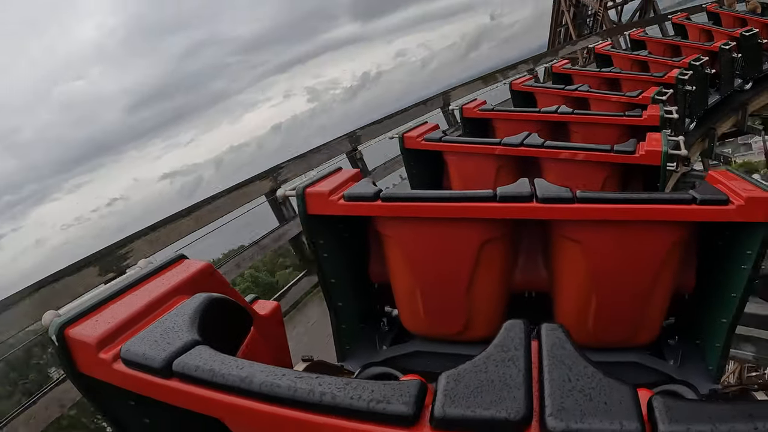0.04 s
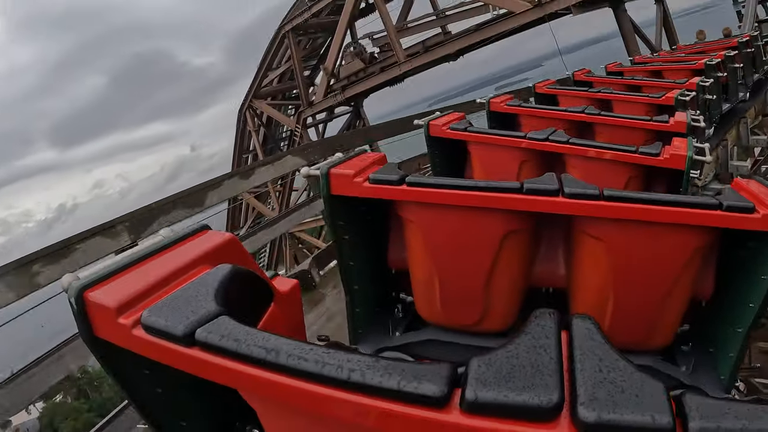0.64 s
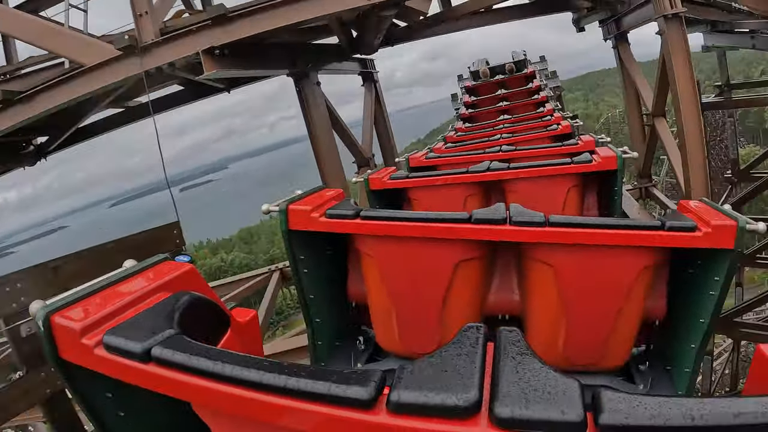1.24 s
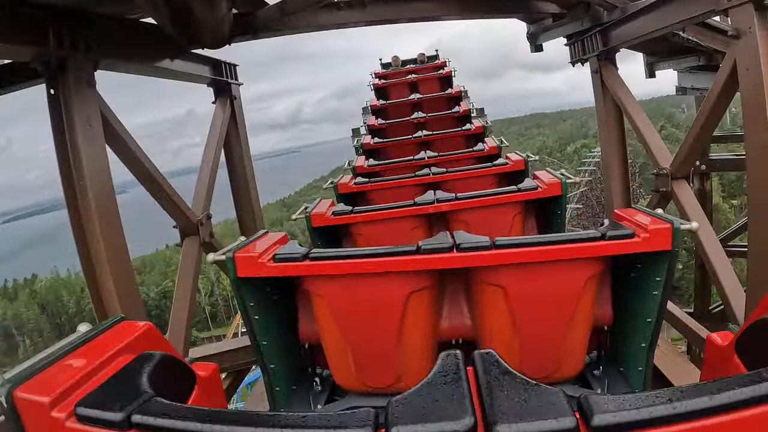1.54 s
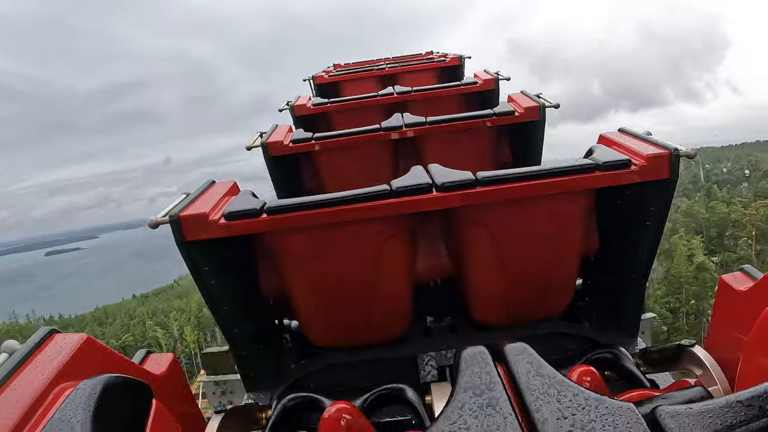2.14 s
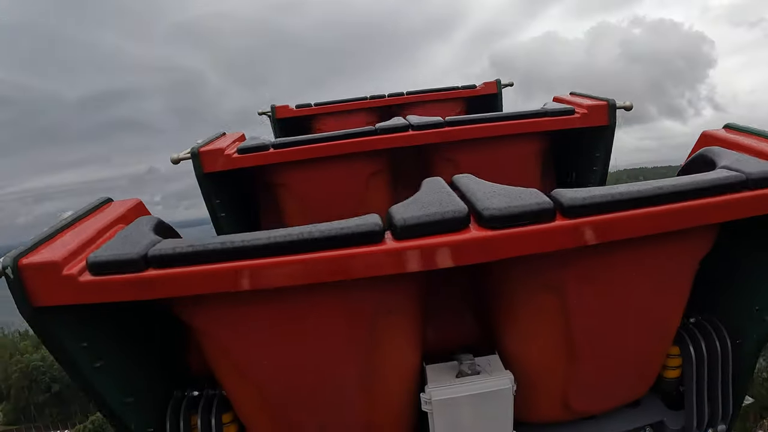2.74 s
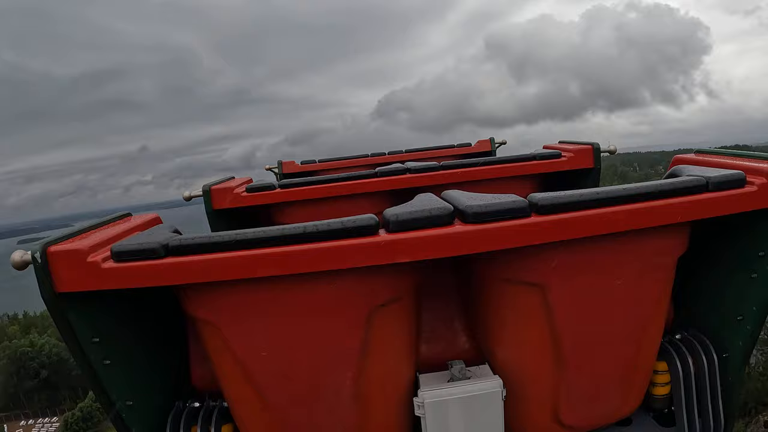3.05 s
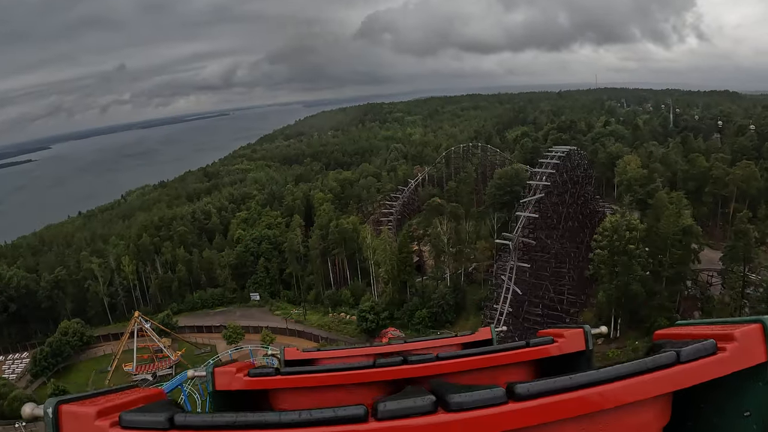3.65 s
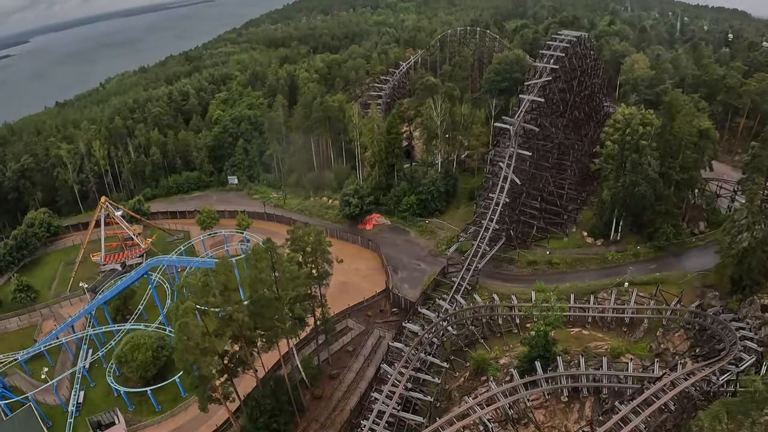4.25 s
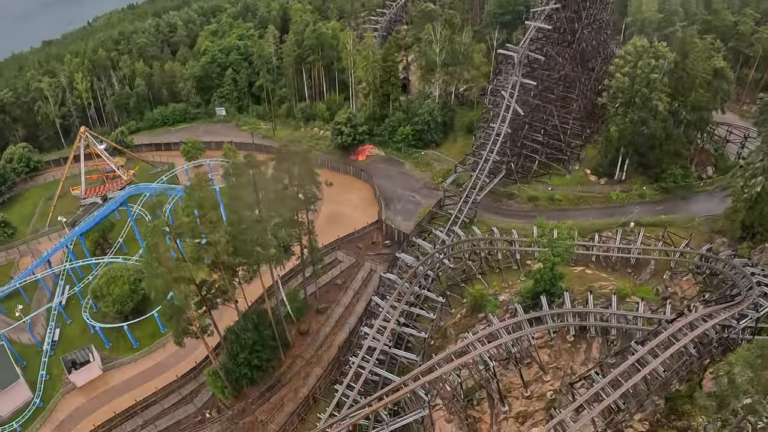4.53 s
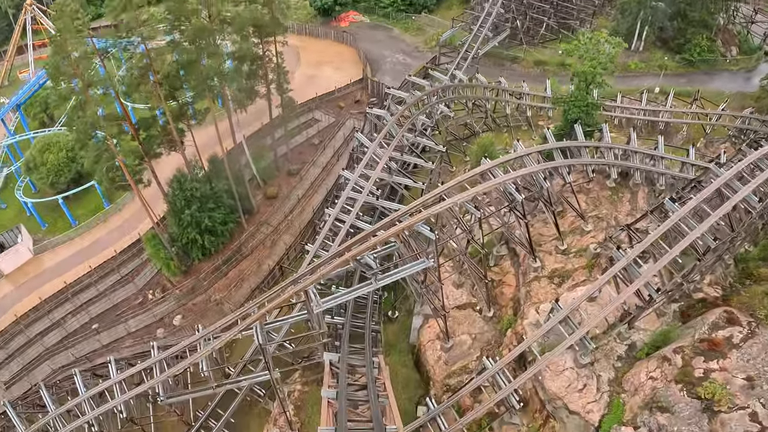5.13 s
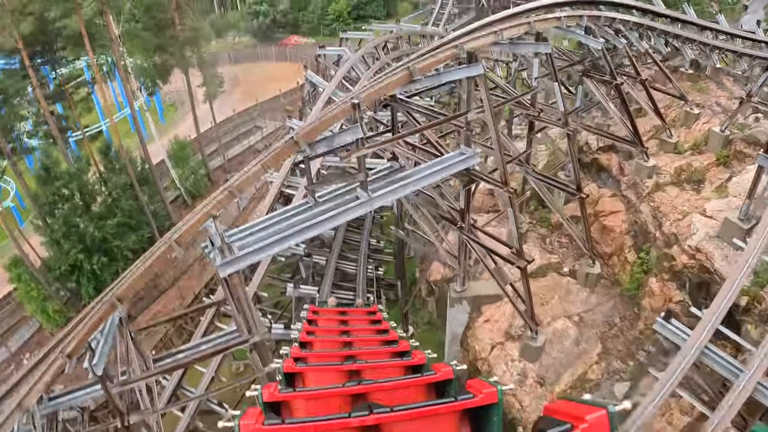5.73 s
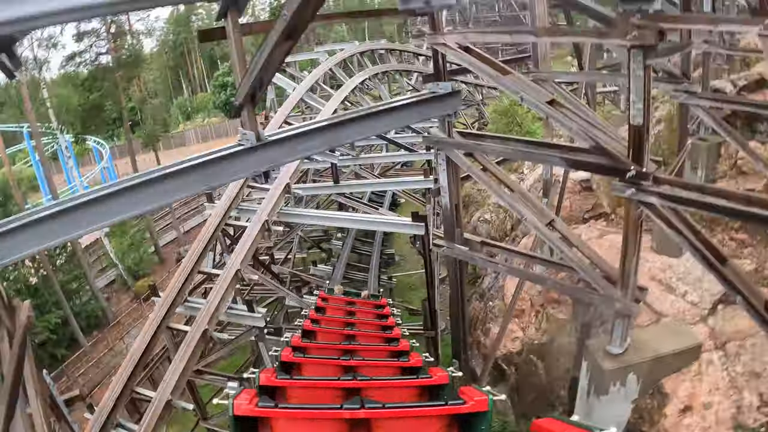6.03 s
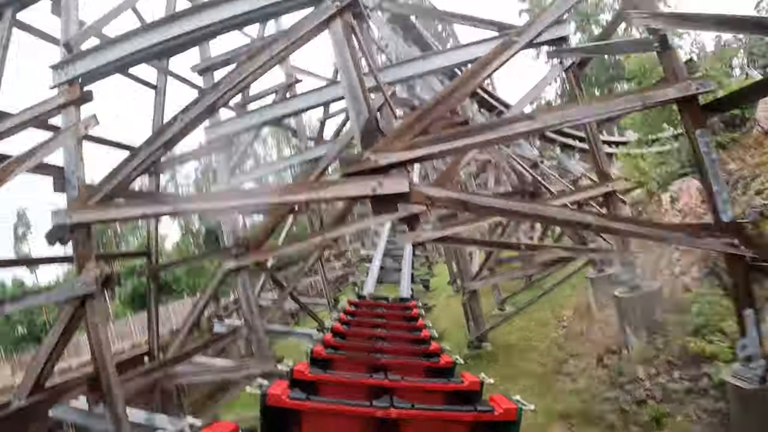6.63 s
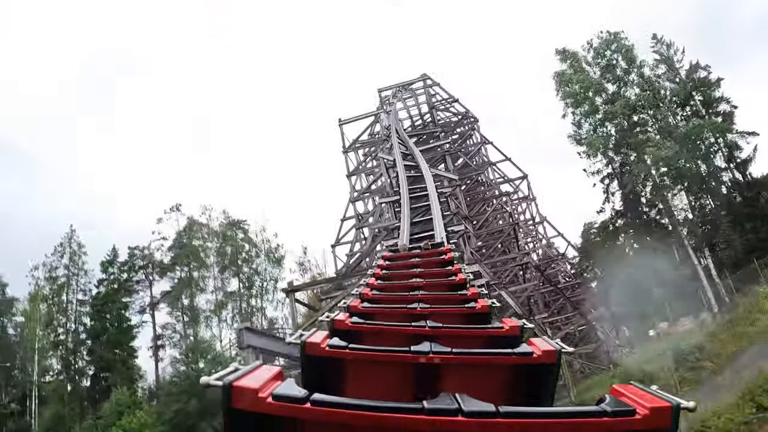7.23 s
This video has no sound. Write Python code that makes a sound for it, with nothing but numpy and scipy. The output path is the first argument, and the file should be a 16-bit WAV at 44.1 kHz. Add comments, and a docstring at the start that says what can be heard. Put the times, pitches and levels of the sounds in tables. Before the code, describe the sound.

A roller coaster train rolls along a wooden track outdoors with a low, hollow rumble, irregular woody clunks and a few brief coupling groans. The noise eases for a moment at the crest, then swells as the train plunges. Strong, crackling wind hits the on-board microphone, metal lap bars clank and jingle close by, and the wheels keep knocking hard to the end.

```python
"""A hollow boom and knocking wheels, close up: the last car of a wooden roller coaster, in open air.
The track shakes the car body; the wheels roar on the rails and their flanges grind in a high curve.
From about 3 s the train tips over the crest and dives, and couplings and lap bars rattle.
Wind buffets the on-board microphone, harder as the speed builds, and the camera limits the peaks."""
import sys
import numpy as np
from scipy import signal
from scipy.fft import rfft, irfft
from scipy.io import wavfile
from scipy.ndimage import uniform_filter1d, minimum_filter1d, map_coordinates

SR = 44100
rng = np.random.default_rng(int(sys.argv[2]) if len(sys.argv) > 2 else 0)


def put_to_file(sound):
    """Save the sound as 16-bit audio at rate SR, in the file named by the first command-line argument."""
    columns = np.atleast_2d(sound).T  # one column per channel
    safe = np.clip(columns, -1, 1)
    whole_steps = np.round(safe * 32767)
    wavfile.write(sys.argv[1], SR, whole_steps.astype(np.int16))


N = 325458
TIME = np.arange(N) / SR

# air on the microphone, calm in the lee of the crest, strong in the dive: t/s, buffet/dB, eddy rush/dB
AIRFLOW = [(0, -22, -23.5), (.25, -22.5, -29.5), (.45, -21.5, -28), (.62, -27, -24.5), (.88, -27, -26),
           (1.02, -21.5, -22.5), (1.35, -22, -26), (1.6, -23, -29.5), (2.0, -21.5, -32.5), (2.18, -23, -29),
           (2.32, -24.5, -26.5), (2.6, -22, -28), (2.85, -21, -27.5), (3.17, -17, -23.5),
           (3.36, -25.5, -33.5), (3.65, -24.5, -34), (3.95, -16.5, -23), (4.5, -18.5, -22),
           (5.0, -16, -21.5), (5.7, -17, -18), (6.35, -15, -17), (7.38, -18.5, -18)]
# gusts and lulls on top of that flow: middle t/s, length/s, change/dB
GUST_SWELLS = [(.5, 0.067, -9), (1.625, 0.094, 6.5), (2.315, 0.46, 6.5), (3.262, .03, -5),
               (3.96, 0.052, 1.5), (4.08, 0.065, -5.5), (4.34, 0.27, 4), (4.505, 0.078, -13.5),
               (4.62, .04, -5), (5.065, 0.11, 3.5), (5.18, 0.083, -6.5), (5.37, 0.073, 6), (5.285, .03, -2),
               (5.44, .035, -2.5), (5.495, 0.035, -6), (5.775, 0.032, 0), (5.811, 0.032, -3),
               (5.9, 0.071, -1), (6.152, 0.074, -3.5), (6.192, 0.028, -4), (6.308, 0.028, -1),
               (6.355, 0.056, 1.5), (6.395, .04, -10), (6.695, 0.032, -2.5), (6.8, 0.083, -2.5),
               (7.09, 0.096, 3), (7.15, 0.078, -5.5), (7.24, .06, 1.5)]
# flow tearing at the microphone port in the dive: t/s, level/dB relative to the eddy rush
PORT_TEARING = [(3.55, -42), (3.85, -15.5), (4.4, -13.5), (5.3, -12.5), (6.3, -13.5), (6.75, -15.5),
                (7.38, -14.5)]
# instants when chatter and crackle ease off: middle t/s, length/s, change/dB
BRIEF_LULLS = [(3.66, 0.075, -5), (4.0, .04, -10), (4.785, .08, -2), (5.0, 0.057, -7), (6.143, 0.038, -5),
               (6.195, 0.024, -4), (6.222, .02, -7), (6.31, 0.025, 0), (6.53, .05, 0.5), (6.70, .04, -9),
               (6.865, 0.043, -8)]
# spectra of the wind on the microphone: f/Hz, level/dB
BUFFET_SPECTRUM = [(8, -11.5), (22, 1.5), (35, 2.5), (55, 1.5), (85, 3), (110, -2.5), (170, -5.5),
                   (300, -73), (1000, -120)]
EDDY_SPECTRUM = [(50, -27.5), (125, -6), (165, 3), (270, 0.5), (400, -6.5), (520, -10), (700, -20),
                 (1000, -23.5), (2000, -49), (4000, -55), (8000, -78.5), (14000, -110)]
CRACKLE_SPECTRUM = [(150, -11.5), (480, 8), (1000, 0), (1700, -4.5), (3000, -15.5), (5000, -33),
                    (7000, -39.5), (10000, -56), (14000, -87)]
FIZZ_SPECTRUM = [(500, -23.5), (3000, 1.5), (5000, 3), (6500, -5.5), (8400, -15), (9500, -27), (12000, -42),
                 (14000, -60)]
# short dry cracks and clicks, mostly amid the dive's wind crackle: t/s, level/dB
SHARP_CRACKS = [(3.106, -36), (3.8695, -21), (4.1987, -26), (4.637, -27), (4.679, -23), (5.177, -30),
                (5.3826, -18.5), (5.522, -33), (6.071, -25), (6.113, -26), (6.206, -26), (6.2765, -28),
                (6.321, -33), (6.368, -26), (6.496, -27), (6.557, -27), (6.626, -34), (7.087, -30),
                (7.224, -29.5), (7.2841, -30.5)]
# spectrum of those cracks: f/Hz, level/dB
SNAP_SPECTRUM = [(300, -15.5), (1200, 14), (3000, 5), (5000, -10.5), (8000, -37.5), (11000, -54.5),
                 (14000, -79.5)]

# wheel flanges grinding in the high curve: t/s, level/dB
FLANGE_GRIND = [(0, -83.5), (1.2, -78), (1.55, -54), (1.95, -61), (2.12, -46), (2.4, -76), (2.7, -88)]
# wheels running under the car: t/s, roar/dB, chatter of loose fittings/dB, hiss/dB
ROLLING = [(0, -40.5, -55.5, -56.5), (.3, -45.5, -51.5, -58), (.6, -36.5, -46.5, -53.5),
           (.85, -39.5, -49.5, -53.5), (1.15, -36, -50, -55.5), (1.55, -36, -51, -56.5),
           (2.12, -37, -43.5, -52), (2.35, -39, -53.5, -61.5), (2.6, -40, -50.5, -63),
           (2.9, -41, -58.5, -58), (3.25, -40, -46, -56), (3.52, -43.5, -56, -60), (3.88, -31, -43, -58.5),
           (4.25, -31, -37.5, -61), (4.55, -33.5, -43.5, -67), (5.1, -33, -41, -59.5), (5.5, -33, -43, -62),
           (6.2, -45, -47.5, -61.5), (7.38, -36.5, -46.5, -60.5)]
# spectra of that rolling noise: f/Hz, level/dB
ROAR_SPECTRUM = [(60, -27.5), (200, -10), (450, -1.5), (750, 2), (1100, -1), (1600, -6.5), (2500, -16.5),
                 (5000, -43.5), (14000, -94.5)]
CHATTER_SPECTRUM = [(200, -30.5), (600, -10), (1200, 0.5), (1700, 0.5), (2200, 0.5), (2750, 0.5),
                    (3600, -4.5), (5000, -21.5), (6100, -30), (6650, -27), (7200, -42), (8000, -45.5),
                    (14000, -76.5)]
HISS_SPECTRUM = [(500, -27.5), (2000, -2.5), (4400, 0), (5300, -2), (6500, -8.5), (7800, -12.5),
                 (10000, -16), (12000, -23), (14000, -47.5)]

# couplings squeaking and groaning: t/s, length/s, start f/Hz, end f/Hz, level/dB
COUPLING_RUBS = [(0.41, 0.055, 1026, 1090, -35), (0.755, 0.057, 201, 144, -12.5),
                 (0.817, 0.052, 148, 110, -11), (3.05, 0.04, 3260, 3370, -45),
                 (1.83, 0.058, 199, 190, -19.5), (3.528, 0.036, 827, 969.8, -32.5),
                 (3.913, .044, 1620, 1850, -33)]
# lap bars and couplings shaking: t/s, clatter/dB, jingle/dB, clank f/Hz, clank/dB
BAR_HITS = [(0.765, -25.5, -48.5, 1440, -41), (1.005, -27, -63, 2362, -34), (1.435, -30, -59, 1290, -26),
            (1.625, -26.5, -63, 2020, -33), (1.826, -25, -49, 2520, -33.5), (2.077, -30, -52, 2130, -43),
            (2.385, -27, -56, 1471, -40), (3.056, -27, -53, 3300, -37), (3.097, -34, -45.5, 1480, -28),
            (3.129, -38, -48.5, 3430, -38), (3.612, -34, -55, 1775, -29.5), (3.686, -26, -50, 1890, -32),
            (3.757, -25, -50, 1606, -25), (3.777, -31, -49, 1480, -31), (3.812, -32, -58, 1520, -30),
            (3.846, -25, -61, 1470, -23), (3.866, -17.5, -39, 2890, -23), (3.923, -24, -46, 1800, -22),
            (3.975, -37, -55, 1480, -36), (4.024, -24.5, -48, 3400, -33), (4.099, -22, -48, 1620, -26),
            (4.112, -21, -48, 2680, -22), (4.145, -25, -54, 1820, -25), (4.168, -29, -46.5, 2730, -20),
            (4.199, -29, -50, 2330, -19.5), (4.275, -21.5, -55, 1468, -34), (4.324, -34, -54, 2600, -28),
            (4.36, -32, -65, 1620, -21), (4.462, -42, -62, 1495, -35), (4.510, -39, -56, 2700, -43),
            (4.541, -28.5, -54, 2505, -38), (4.634, -20.5, -58, 2020, -27),
            (4.677, -20.5, -48.5, 1490, -23), (4.694, -29, -42.5, 2385, -25), (4.722, -22, -48, 2780, -27),
            (4.810, -30, -60, 1590, -26), (4.865, -30, -52, 2600, -33), (4.938, -29, -47, 1476, -29),
            (5.046, -37, -47.5, 2762, -37), (5.076, -33, -53, 1710, -35), (5.258, -22.5, -45.5, 2886, -31),
            (5.382, -24, -56, 2643, -33), (5.451, -28, -57, 2410, -24), (5.545, -29, -63, 1499, -27),
            (5.668, -34, -60, 1600, -35), (6.229, -29, -54, 2270, -33), (6.357, -27, -58, 1450, -26),
            (6.488, -26.5, -62.5, 1430, -19), (6.576, -32, -51, 2700, -37)]
# modes of a clanking bar: multiple of the clank pitch, level/dB, decay/s
BAR_MODES = [(.63, -9, .005), (.82, -12, 0.005), (1.0, -4, 0.0095), (1.09, -7, .008), (1.27, -15.5, .004),
             (1.5, -16, 0.0046)]
# modes of the steel fittings and of the smallest steel parts: f/Hz, level/dB, t60/s
FITTING_MODES = [(1468, 9, 0.09), (1920, 3, 0.06), (2080, -2.5, 0.052), (2405, 3, 0.082), (2585, 0, 0.098),
                 (2734, 0, 0.12), (3040, -2, 0.087), (3280, -6, 0.1), (3530, -8, 0.1), (4320, -12.5, 0.16),
                 (5700, -18, 0.1), (6500, -23.5, 0.084), (6800, -25.5, 0.085), (7280, -31, .18)]
TINKLE_MODES = [(4950, -2.5, .05), (5850, -3, .06), (6050, -4, .06), (6580, -1, .11), (6850, -4, .1),
                (10600, -21, .1)]
# spectra of the bars and small parts: f/Hz, level/dB
CLATTER_SPECTRUM = [(100, -41.5), (300, -9.5), (900, 8.5), (1700, 7), (2900, 3.5), (4000, -3.5),
                    (5400, -12.5), (6800, -29.5), (9000, -42), (14000, -83.5)]
JINGLE_SPECTRUM = [(800, -31.5), (3400, 4.5), (5000, 5.5), (6100, -1), (6650, -5), (7200, -9), (8600, -12),
                   (10600, -19.5), (11600, -29.5), (14000, -55.5)]

# wheel sets knocking on the rails: t/s, woody clunk/dB, ring f/Hz, ring/dB, floor thump/dB
WHEEL_KNOCKS = [(0.043, -22, 640, -23, -32), (0.088, -28, 726, -18.5, -31), (0.418, -31, 1094, -21, -36),
                (0.436, -20, 1029, -19, -16.5), (0.657, -30, 804, -19, -33), (0.663, -33, 1070, -20, -35),
                (0.772, -17, 480, -21.5, -22), (0.995, -19, 557, -17, -17),
                (1.221, -30, 1038, -21.5, -19.5), (1.431, -11, 1000, -17.5, -16.5),
                (1.584, -34, 416, -19, -28), (1.632, -22, 497, -15.5, -31), (1.666, -20, 900, -17, -23),
                (1.671, -22, 1234, -16, -33), (1.820, -18.5, 793, -20.5, -19.5),
                (2.078, -24, 647, -20.5, -20), (2.264, -24, 710, -21.5, -16), (2.308, -21, 650, -17.5, -28),
                (2.418, -18, 690, -18.5, -26), (2.68, -21.5, 718, -20.5, -26),
                (2.803, -17, 837, -19.5, -31), (2.839, -22, 760, -24, -21), (3.010, -19.5, 600, -20, -23),
                (3.096, -18, 815, -22, -21), (3.236, -20.5, 560, -20.5, -30), (3.278, -21, 902, -19.5, -30),
                (3.952, -27, 800.8, -21, -38), (4.096, -19, 810.3, -19, -23), (4.34, -16, 758, -22, -27),
                (4.381, -15, 850, -24, -28), (4.637, -22, 800, -22, -30), (5.080, -23, 1085, -17, -27),
                (5.119, -15, 602, -19, -33), (5.297, -16, 1070, -16, -27), (5.459, -17, 1000, -15, -28),
                (5.507, -17, 722, -20, -21), (5.548, -14.5, 892, -17.5, -29), (5.665, -14, 1050, -21, -19),
                (5.787, -26, 710, -22, -22), (5.824, -23, 606, -21, -15), (5.956, -20, 750, -23, -20),
                (6.070, -18, 935, -20, -26), (6.122, -20.5, 804, -19, -23), (6.205, -19, 759, -19, -23),
                (6.233, -21, 860, -23, -20), (6.32, -19, 973, -18, -26), (6.363, -14, 776, -18, -30),
                (6.621, -24, 950, -18.5, -24), (6.708, -24, 860, -16, -20), (6.734, -17.5, 740, -22, -27),
                (6.852, -23, 760, -21, -23), (6.918, -24, 720, -19, -24), (6.936, -15, 960, -15, -17),
                (7.084, -11, 757, -14, -10.5), (7.221, -21, 904, -15.5, -13), (7.321, -22, 820, -22, -31)]
# hollow modes of a wheel set: multiple of the ring pitch, level/dB, decay/s
WHEEL_SET_MODES = [(.56, -12, 0.0056), (.74, -8.5, 0.0054), (.87, -7.5, .007), (1.0, -4.5, 0.0071),
                   (1.2, -12, .006), (1.45, -19.5, 0.0036), (1.9, -22.5, .003)]
# spectra of the clunk and of the frame's rumble after it: f/Hz, level/dB
CLUNK_SPECTRUM = [(90, -8), (200, -9), (400, 9.5), (650, 2.5), (1100, 1), (1500, -13.5), (2600, -20.5),
                  (4500, -29), (9000, -54.5), (14000, -92)]
SHUDDER_SPECTRUM = [(60, -20.5), (170, 3), (280, 0), (450, -7.5), (800, -20), (2000, -46.5), (14000, -100)]
# resonance of the hollow car body, before the load acts on it: t/s, f/Hz, level/dB
BODY_BOOM = [(0, 123.3, -20), (.6, 126, -20.5), (1.2, 120.9, -18), (1.85, 122.2, -23), (2.08, 124.2, -21),
             (2.4, 120.2, -21), (2.8, 115.8, -18.5), (3.15, 110.5, -29.5), (3.35, 115.8, -17.5),
             (4.2, 117.8, -22), (5.0, 113.2, -25.5), (5.7, 131.2, -20), (6.4, 118.8, -28),
             (7.38, 134, -23.5)]
# the boom swells as the car leans on the track, slackens as it lifts: middle t/s, length/s, change/dB
LOAD_SWELLS = [(.035, 0.06, -7), (.3, 0.073, 2), (.57, 0.11, 4), (.72, 0.1, 2.5), (.81, 0.17, -9),
               (1.17, 0.064, 0.5), (1.3, 0.063, -4.5), (1.45, 0.093, 4.5), (1.72, 0.063, -9.5),
               (1.79, 0.089, 2.5), (1.88, 0.07, -8.5), (2.04, 0.13, 4), (2.28, .1, -8), (2.47, 0.098, -5.5),
               (2.55, 0.092, 4), (2.63, 0.11, -6), (2.81, 0.18, 2.5), (3.23, .12, -6.5), (3.35, 0.072, 2.5),
               (3.46, .1, -10), (3.55, .07, 3), (3.63, 0.057, -4.5)]


def undb(db):
    """Decibels to gain."""
    return 10 ** (np.asarray(db) / 20)


def unit(x):
    """Scale to rms 1."""
    return x / np.sqrt(np.mean(np.abs(x) ** 2))


def add(track, s, sound):
    """Mix a sound into the track, starting at s seconds."""
    start = int(s * SR)
    track[start:start + len(sound)] += sound[:N - start]


def curves(table):
    """The columns of a control table, one value per sample."""
    s, *columns = np.transpose(table)
    return [np.interp(TIME, s, column) for column in columns]


def swells(table):
    """Level change in dB from smooth swells and lulls (middle t/s, length/s, change/dB)."""
    change_db = np.zeros(N)
    for s, length, db in table:
        add(change_db, s - length / 2, db * np.hanning(int(length * SR)))
    return change_db


def walk(rate_hz):
    """Smooth random motion of rms 1 that changes about rate_hz times a second."""
    hold = max(int(SR / rate_hz), 1)
    steps = np.repeat(rng.standard_normal(N // hold + 1), hold)[:N]
    return unit(uniform_filter1d(steps, hold))


def colour(x, spectrum):
    """Pass x through a minimum-phase filter of unit energy with the given shape (f/Hz, level/dB)."""
    size = 8192
    hz, db = np.transpose(spectrum)
    bin_hz = np.arange(size // 2 + 1) * SR / size
    log_gain = np.log(undb(np.interp(np.log(bin_hz + 1), np.log(hz), db)))
    cepstrum = irfft(log_gain)
    cepstrum[1:size // 2] *= 2
    cepstrum[size // 2 + 1:] = 0
    response = irfft(np.exp(rfft(cepstrum)))
    return signal.fftconvolve(x, response / np.linalg.norm(response))[:N]


def steady(x, span_s):
    """Even out the swells of a noise that are slower than span_s."""
    return x / np.sqrt(uniform_filter1d(np.abs(x) ** 2, int(span_s * SR)) + 1e-9)


def blows(table, rise_s, length_s, tail_db, tail_s, bounce_hz, grit_db):
    """Contact force of blows (t/s, level/dB): a quick scrape, then a tail as the part bounces to rest."""
    power, age = np.zeros(N), TIME[:SR // 3]
    decay = np.exp(-2 * age / length_s) + undb(tail_db) ** 2 * np.exp(-2 * age / tail_s)
    one_blow = decay * (1 - np.exp(-age / rise_s)) ** 2
    for s, db in table:
        add(power, s, undb(db) ** 2 * one_blow)
    grit = rng.standard_normal(N) * undb(grit_db * walk(bounce_hz))
    return np.sqrt(power) * steady(grit, span_s=0.0012)


def strikes(table, modes, rebound_s, rebound_db):
    """Strikes (t/s, f/Hz, level/dB) on a ringing part; each rebounds once, and no two ring alike."""
    out, age = np.zeros(N), TIME[:SR // 8]
    attack = 1 - np.exp(-age / .0004)
    for s, hz, db in table:
        for bounce in (0, 1):
            lag, *shades = rng.standard_normal(len(modes) + 1)
            ring = sum(undb(mode_db + 2 * shade) * np.sin(2 * np.pi * hz * ratio * age)
                       * np.exp(-age / decay_s) for (ratio, mode_db, decay_s), shade in zip(modes, shades))
            delay_s = bounce * rebound_s * undb(2 * lag)
            add(out, s + delay_s, ring * attack * undb(db + bounce * rebound_db))
    return out


def steel(force, modes, count=3, pitch_spread=.012):
    """Several steel fittings, each tuned a little differently, ring as the force reaches them by turns."""
    out, age = 0, TIME[:SR // 2]
    for tunings in 1 + pitch_spread * rng.standard_normal((count, len(modes))):
        ring = sum(undb(db - 60 * age / t60) * np.sin(2 * np.pi * hz * tuning * age)
                   for (hz, db, t60), tuning in zip(modes, tunings))
        out = out + signal.fftconvolve(force * walk(20), ring / np.linalg.norm(ring))[:N]
    return out / np.sqrt(count)


def port_crackle(eddies, rush_db):
    """In the dive the flow keeps tearing at the microphone port and settling: rough, fizzy bursts."""
    dive_db, = curves(PORT_TEARING)
    tear_db = 6.5 * np.tanh(2 * walk(rate_hz=120))
    tearing = unit(np.tanh(np.abs(eddies)) * undb(tear_db))
    crackle = colour(steady(rng.standard_normal(N) * tearing, span_s=0.13), CRACKLE_SPECTRUM)
    fizz = colour(steady(rng.standard_normal(N) * tearing ** 0.36, span_s=0.2), FIZZ_SPECTRUM)
    flicker_db = 2.5 * np.tanh(walk(rate_hz=43.5))
    return (crackle + undb(-22.5) * fizz) * undb(rush_db + dive_db + swells(BRIEF_LULLS) + flicker_db)


def wind(gust_db):
    """Large eddies push on the microphone, small ones break off in puffs; returns sound and puff gain."""
    buffet_db, rush_db = curves(AIRFLOW)
    buffet = steady(colour(rng.standard_normal(N), BUFFET_SPECTRUM), span_s=0.052)
    puffs = undb(1.55 * walk(rate_hz=110))
    eddies = colour(rng.standard_normal(N) * puffs, EDDY_SPECTRUM)
    # faster air sweeps each eddy past sooner, so the rush rises in pitch
    speed = np.interp(TIME, [3.3, 4.6, 7.0], [.88, 1.12, 1.16])
    eddies = steady(map_coordinates(eddies, [np.cumsum(speed)], order=3, mode="mirror"), span_s=.05)
    air = buffet * undb(buffet_db + 0.79 * gust_db) + eddies * undb(rush_db + gust_db)
    return air + port_crackle(eddies, rush_db + 0.94 * gust_db), puffs


def dry_snaps():
    """Short dry cracks and clicks with hardly any tail, mostly amid the dive's wind crackle."""
    bursts = blows(SHARP_CRACKS, rise_s=.0002, length_s=.006,
                   tail_db=-13, tail_s=.02, bounce_hz=300, grit_db=2)
    return colour(bursts, SNAP_SPECTRUM)


def flanges(pitch_hz=4320, width_hz=1500):
    """In the curve the wheel flanges grind on the rail: a faint, unsteady, noisy whine."""
    db, = curves(FLANGE_GRIND)
    grind = uniform_filter1d(rng.standard_normal(N), int(SR / width_hz))
    grind = unit(uniform_filter1d(grind, int(SR / width_hz / 2))) * undb(2.5 * walk(rate_hz=18))
    return np.sqrt(2) * grind * np.cos(2 * np.pi * pitch_hz * TIME) * undb(db - 5.5)


def jolts(height_db=1.5, decay_s=0.078):
    """Level change in dB of the running gear, which flares after each knock and settles in between."""
    flare, age = np.zeros(N), TIME[:SR // 3]
    for s, *_ in WHEEL_KNOCKS:
        add(flare, s, np.exp(-age / decay_s))
    flare = uniform_filter1d(np.minimum(flare, 1), int(.004 * SR))
    return height_db * (flare - flare.mean())


def wheels(puffs, gust_db, taps_per_s=460):
    """Under the car, wheels roar and hiss and shake loose fittings; gusty air makes it all flutter."""
    roar_db, chatter_db, hiss_db = curves(ROLLING)
    jolt_db = jolts()
    flutter = unit(puffs ** 0.4 * undb(1.6 * walk(rate_hz=50)))
    roar = unit(colour(rng.standard_normal(N) * flutter, ROAR_SPECTRUM))
    impacts = unit(rng.uniform(-1, 1, N) * (rng.random(N) < taps_per_s / SR))
    taps = impacts + undb(2) * rng.standard_normal(N)
    taps = unit(taps * flutter) * undb(chatter_db + jolt_db + swells(BRIEF_LULLS))
    chatter = colour(taps, CHATTER_SPECTRUM) + undb(-15.5) * steel(taps, FITTING_MODES)
    hiss = colour(rng.standard_normal(N) * flutter ** .5, HISS_SPECTRUM)
    rolling = roar * undb(roar_db + jolt_db) + hiss * undb(hiss_db)
    return rolling * undb(0.47 * gust_db) + chatter * undb(0.16 * gust_db)


def coupling_squeaks():
    """Couplings rub as the cars sway and tip over the crest: brief, rough glides."""
    out, waver = np.zeros(N), walk(rate_hz=500)
    scrape = unit(undb(4 * walk(rate_hz=400)))
    for s, length, start_hz, end_hz, db in COUPLING_RUBS:
        size = int(length * SR)
        hz = np.linspace(start_hz, end_hz, size) * (1 + 0.065 * waver[int(s * SR):][:size])
        glide = np.sqrt(2) * np.sin(2 * np.pi * np.cumsum(hz) / SR)
        add(out, s, undb(db) * np.hanning(size) * glide)
    return out * scrape


def bar_rattles():
    """Close by, lap bars and couplings clank and clatter to rest; small steel parts jingle along."""
    hits = np.array(BAR_HITS)
    force = blows(hits[:, [0, 1]], rise_s=0.0029, length_s=0.021,
                  tail_db=-9, tail_s=0.055, bounce_hz=290, grit_db=5)
    shake = blows(hits[:, [0, 2]], rise_s=0.004, length_s=0.011,
                  tail_db=-20.5, tail_s=.045, bounce_hz=206, grit_db=0)
    clatter = undb(-7.5) * colour(force, CLATTER_SPECTRUM) + undb(-12) * steel(force, FITTING_MODES)
    clanks = strikes(hits[:, [0, 3, 4]], BAR_MODES, rebound_s=0.014, rebound_db=-3.5)
    buzz = unit(undb(3.5 * walk(rate_hz=448.4)))  # a loose bar buzzes against its stop as it rings
    jingle = undb(9) * colour(shake, JINGLE_SPECTRUM) + undb(-6) * steel(shake, TINKLE_MODES)
    return clatter + clanks * buzz + jingle


def frame_shudder():
    """Each wheel knock leaves a brief low rumble in the frame; its level follows the hollow ring's."""
    knocks = np.array(WHEEL_KNOCKS)[:, [0, 3]]
    force = blows(knocks, rise_s=0.0013, length_s=0.027,
                  tail_db=-19.5, tail_s=0.076, bounce_hz=60, grit_db=-1)
    return undb(-3.5) * colour(force, SHUDDER_SPECTRUM)


def wheel_knocks(thump_hz=195):
    """Wheel sets take up their play against the rails: woody clunk, hollow ring and floor thump."""
    knocks = np.array(WHEEL_KNOCKS)
    force = blows(knocks[:, :2], rise_s=0.00026, length_s=0.024,
                  tail_db=-14, tail_s=0.052, bounce_hz=225, grit_db=5)
    clunks = undb(-8.5) * colour(force, CLUNK_SPECTRUM)
    rings = strikes(knocks[:, [0, 2, 3]], WHEEL_SET_MODES, rebound_s=.0095, rebound_db=-10)
    thumps, age = np.zeros(N), TIME[:SR // 6]
    envelope = np.exp(-age / 0.048) * (1 - np.exp(-age / 0.0016))
    for s, *_, thump_db in knocks:
        hz = thump_hz * (1 + 0.1 * rng.standard_normal())
        add(thumps, s, undb(thump_db) * envelope * np.sin(2 * np.pi * hz * age))
    return clunks + rings + thumps


def car_body():
    """Rough track keeps one broad resonance of the car booming; more load makes it louder and lower."""
    hz, db = curves(BODY_BOOM)
    load_db = swells(LOAD_SWELLS)
    waver = 0.0739 * walk(rate_hz=17)
    hz = hz * (1 - 0.04 * load_db + waver)
    shake = steady(walk(rate_hz=36) + 1j * walk(rate_hz=36), span_s=0.068)
    boom = np.real(shake * np.exp(2j * np.pi * np.cumsum(hz) / SR))
    return unit(boom) * undb(db + load_db)


def scene():
    """One microphone on the last car, in open air; every source rides along with it."""
    gust_db = swells(GUST_SWELLS)
    air, puffs = wind(gust_db)
    running = car_body() + wheels(puffs, gust_db) + flanges() + wheel_knocks() + frame_shudder()
    return (air + running + bar_rattles() + dry_snaps() + coupling_squeaks())[None]


def record(dry):
    """The on-board camera gently turns down the loudest peaks and cuts the top."""
    ceiling, top_hz, hold = .66, 14000, int(0.01 * SR)
    gain = (1 + (np.abs(dry) / ceiling) ** 6) ** (-1 / 6)
    gain = uniform_filter1d(minimum_filter1d(gain, hold), hold)
    lowpass = signal.ellip(8, .2, 70, top_hz, fs=SR, output="sos")
    return signal.sosfilt(lowpass, dry * gain)


dry = scene()
out = record(dry)
put_to_file(out)
```